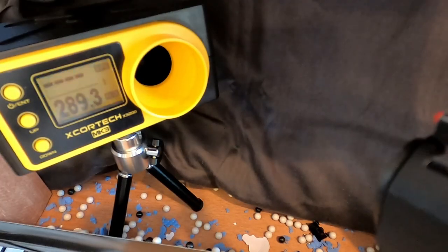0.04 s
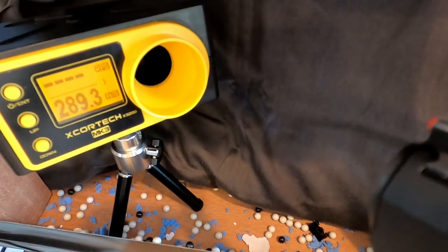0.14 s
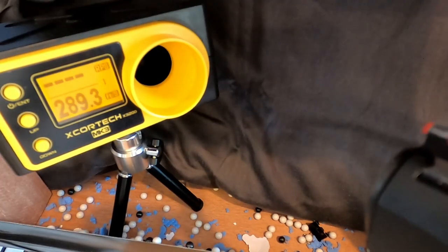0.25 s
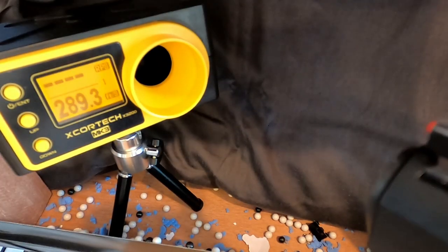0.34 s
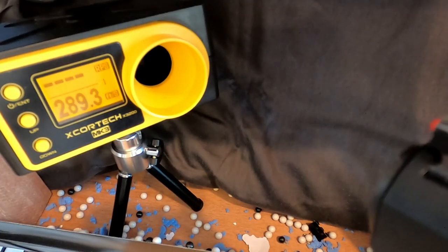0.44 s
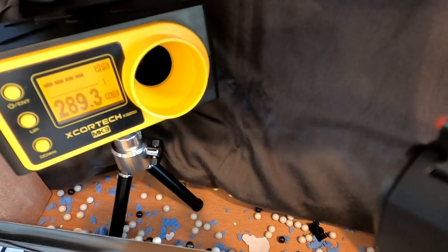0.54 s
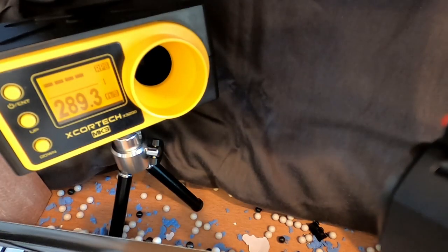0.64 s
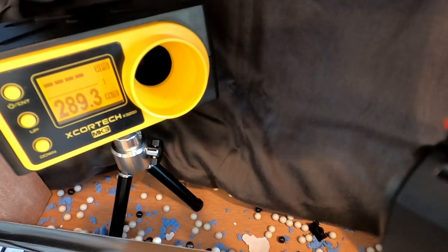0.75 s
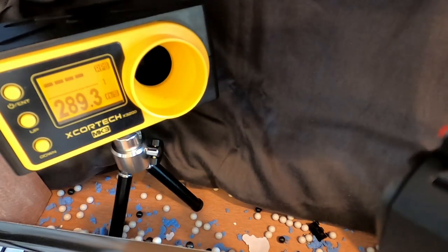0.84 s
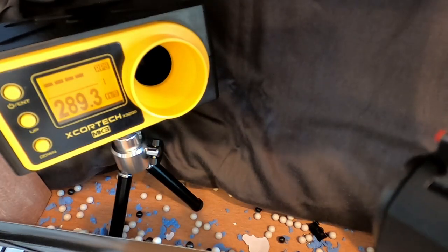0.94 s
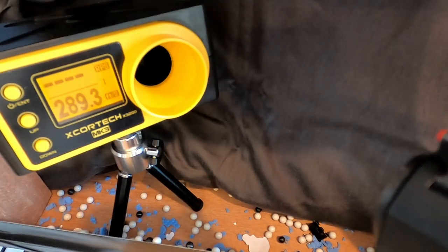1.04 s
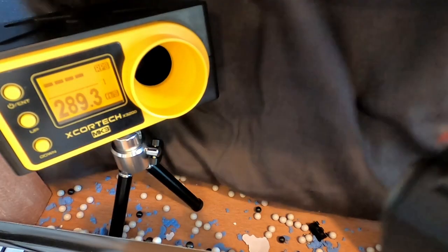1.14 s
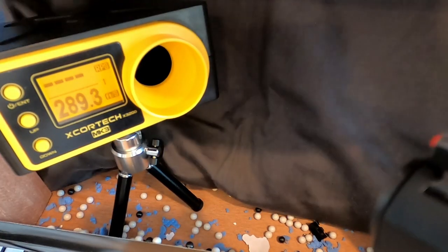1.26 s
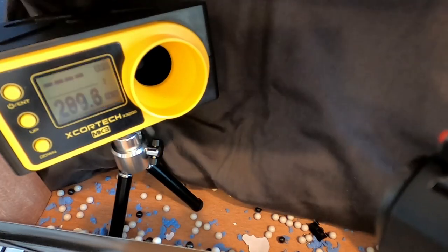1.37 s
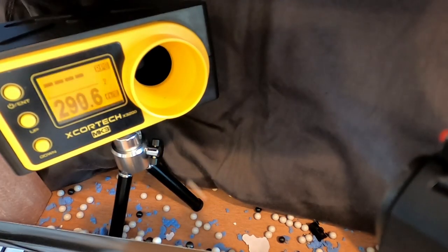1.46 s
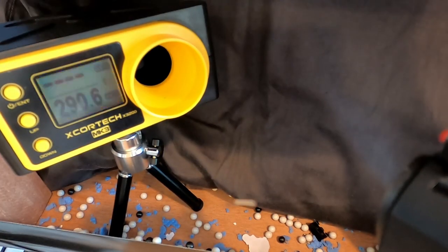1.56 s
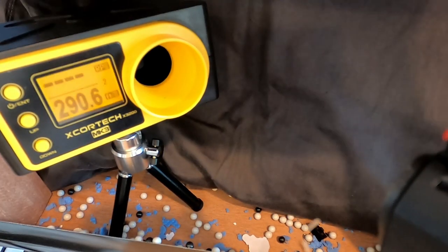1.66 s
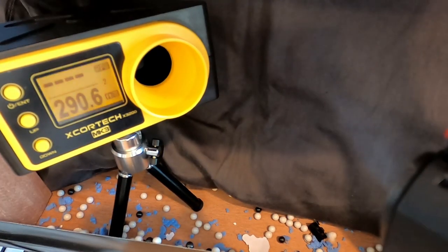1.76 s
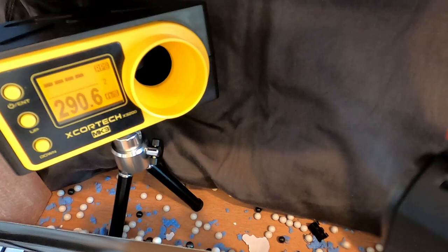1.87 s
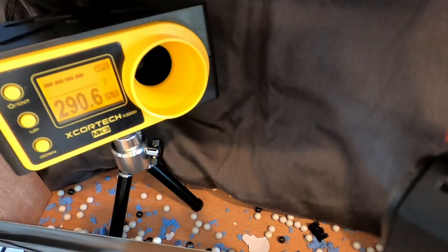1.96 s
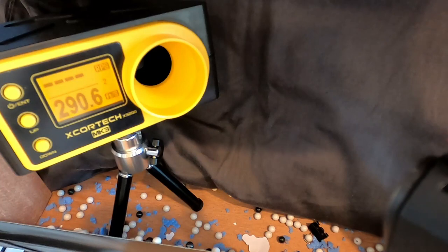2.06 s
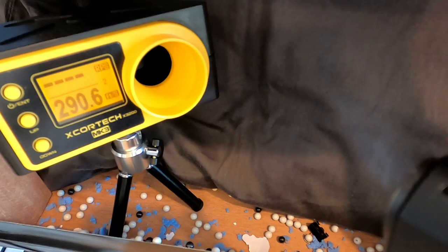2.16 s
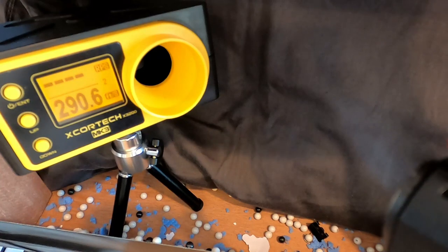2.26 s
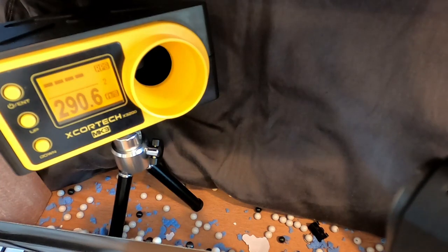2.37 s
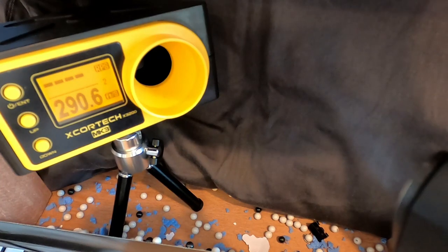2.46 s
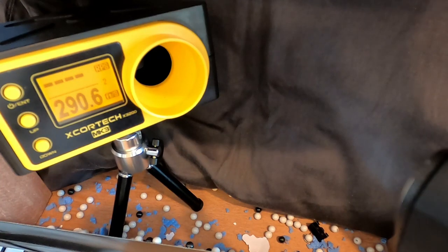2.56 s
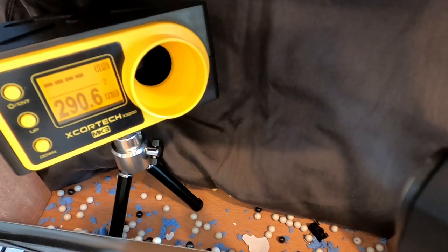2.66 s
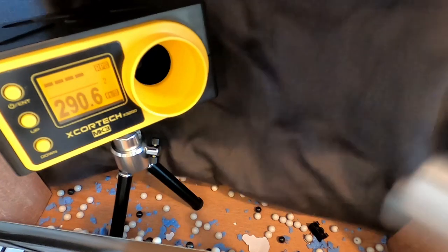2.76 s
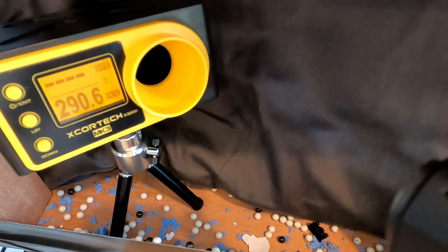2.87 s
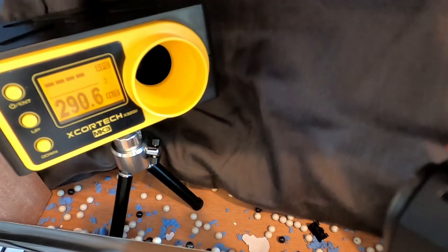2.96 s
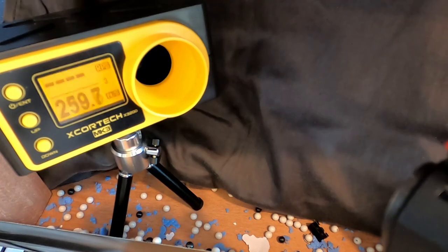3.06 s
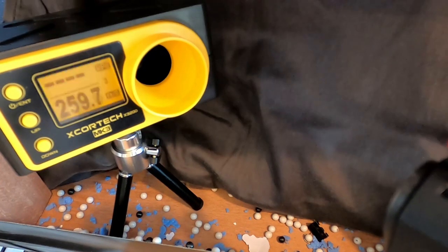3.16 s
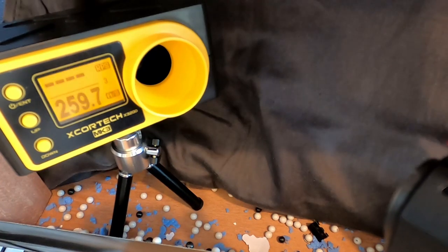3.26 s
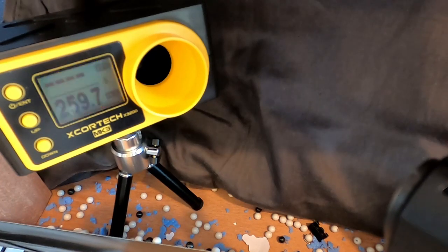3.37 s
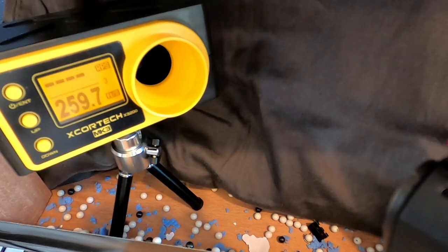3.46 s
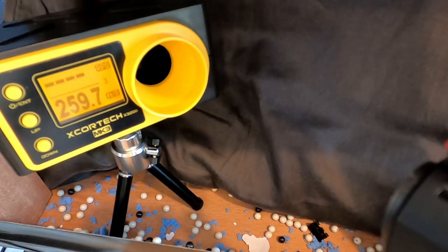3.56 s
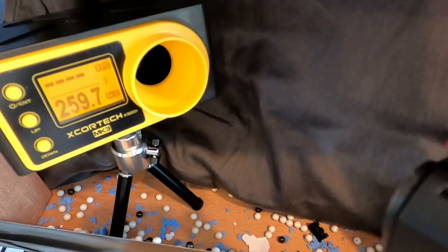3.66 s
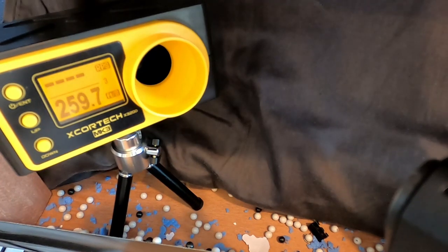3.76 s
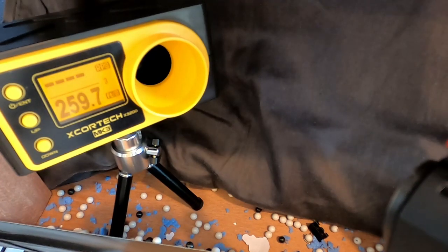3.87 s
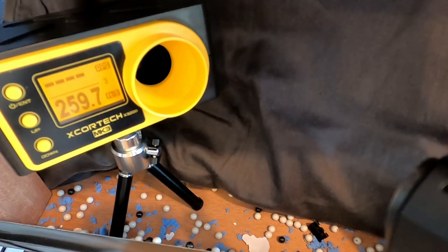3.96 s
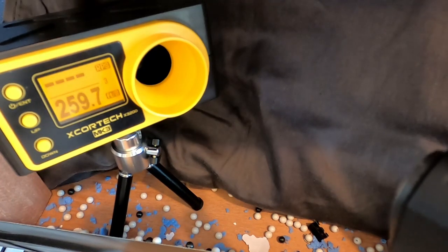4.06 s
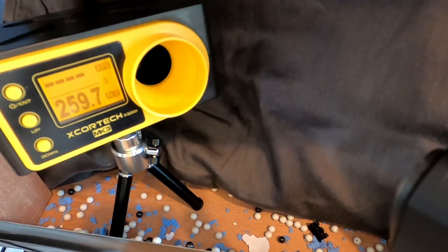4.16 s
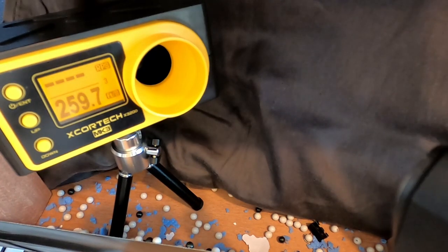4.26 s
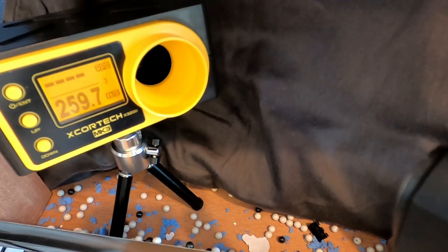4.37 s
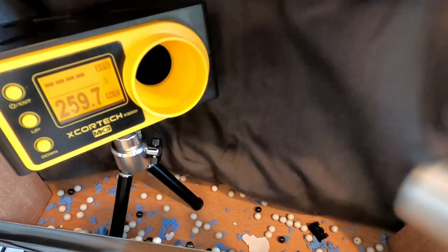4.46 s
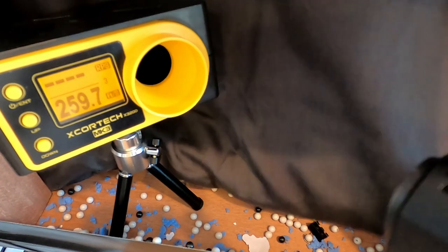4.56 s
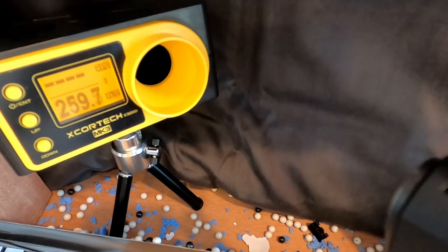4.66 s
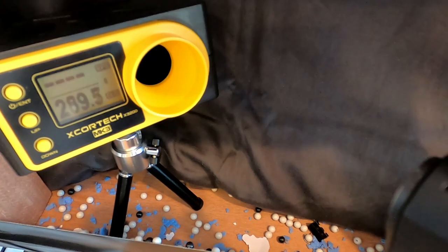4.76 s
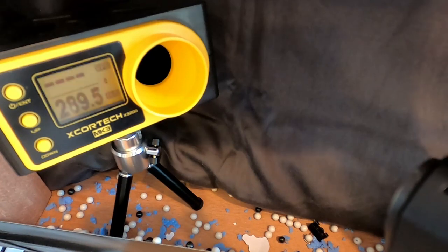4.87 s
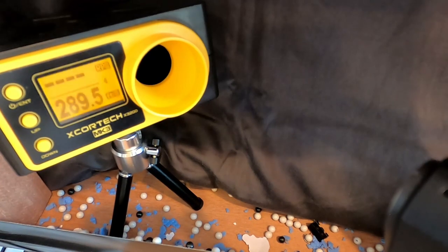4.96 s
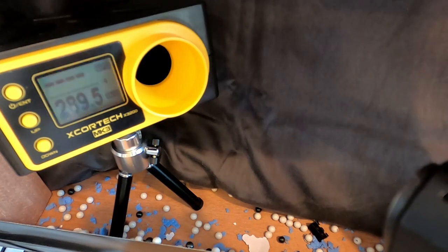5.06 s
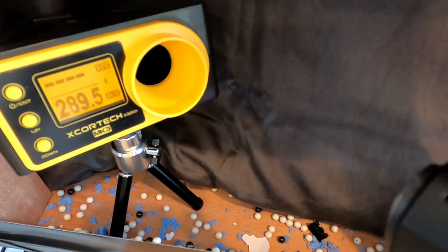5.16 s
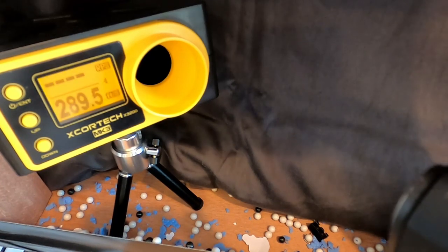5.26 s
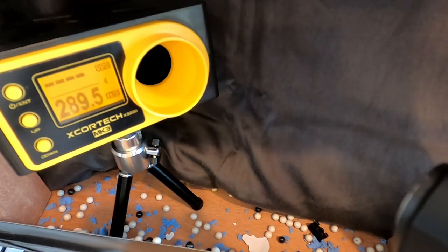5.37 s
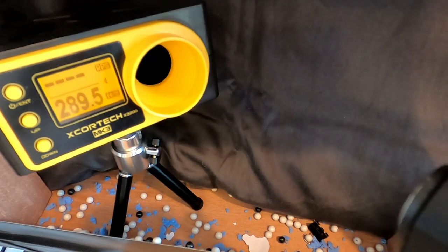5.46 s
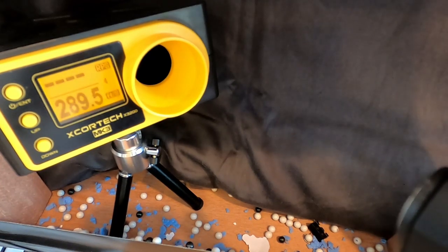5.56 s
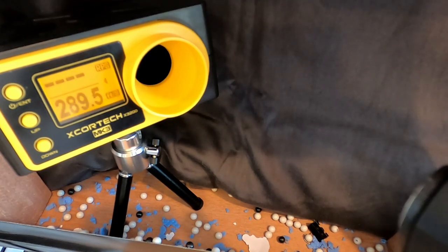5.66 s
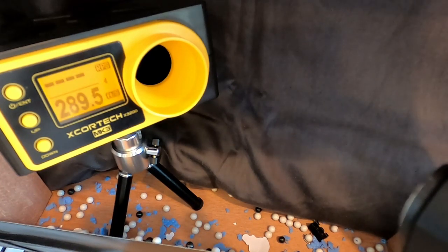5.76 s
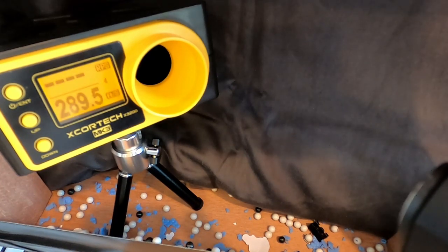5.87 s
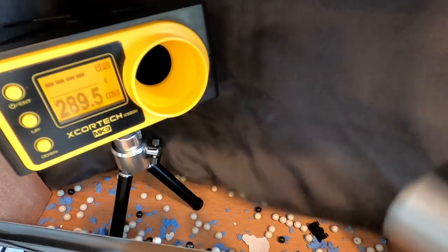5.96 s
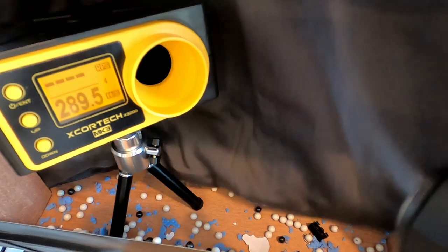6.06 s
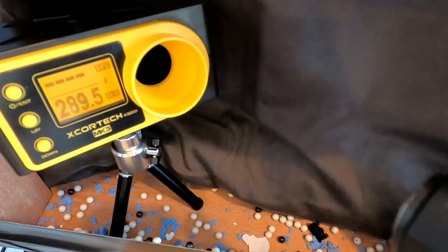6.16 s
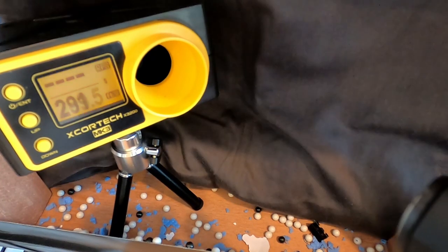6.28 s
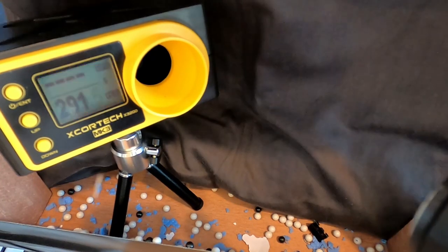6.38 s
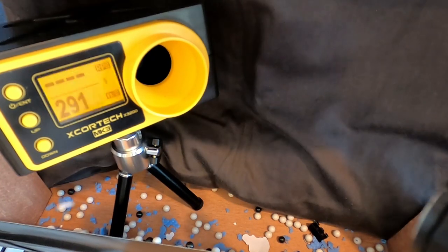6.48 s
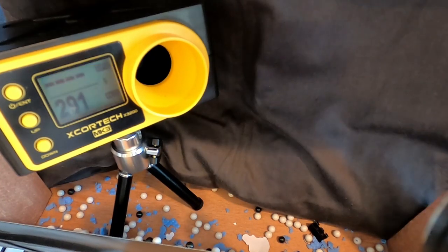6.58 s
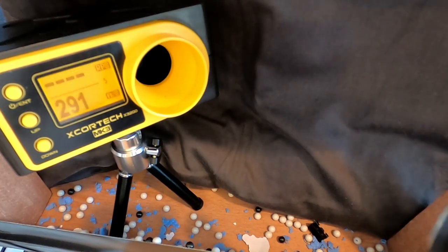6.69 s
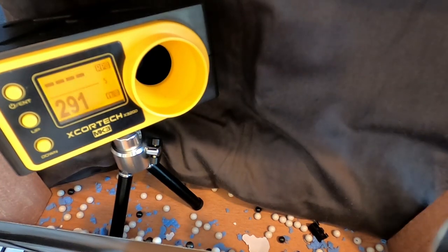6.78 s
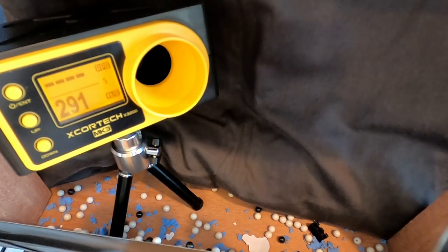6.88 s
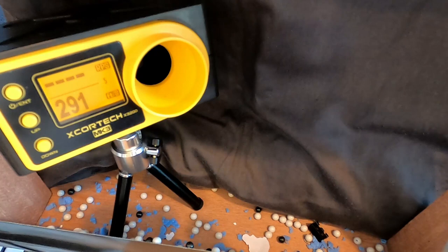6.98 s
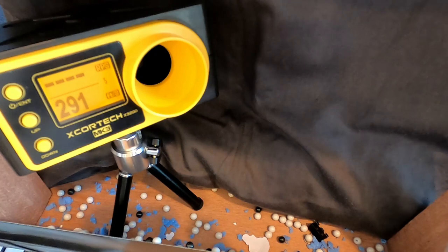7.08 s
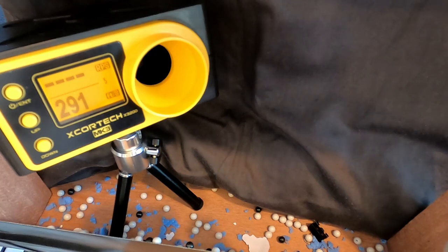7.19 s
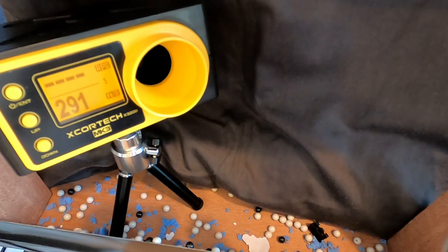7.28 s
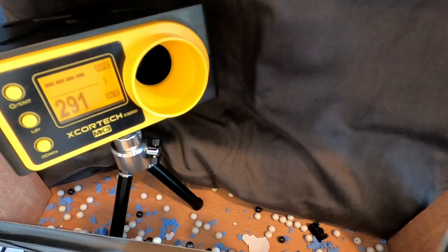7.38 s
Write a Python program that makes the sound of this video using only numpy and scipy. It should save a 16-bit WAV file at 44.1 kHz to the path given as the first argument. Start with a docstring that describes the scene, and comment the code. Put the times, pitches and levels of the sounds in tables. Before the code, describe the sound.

At the start, the tail of an earlier shot dies away into a quiet room with barely audible low rumble. At about 1.2 seconds a gas airsoft pistol fires very close: a split-second rising hiss, a sharp bright crack, a short boxy thump, and within some 55 milliseconds the metallic clack of the slide slamming shut. The room rings for well under a second. Light plastic pellets tick on hard floor from 1.55 to 2.0, with a tiny metallic click near 1.8. Similar shots come at 2.85, 4.55 and 6.05 seconds, a slight ringing tinge on the third. Single pellet ticks fall around 3.05, 5.5 and just before the last shot. After it, bounces patter irregularly from 6.35 to 7.4, the clearest near 6.55. Close, dry phone pickup, loud peaks slightly squashed, the quiet gaps sinking almost to silence.

```python
"""A gas blow-back pistol fires plastic pellets at a cloth in a box, close to a phone in a quiet room.
Each shot: banded noise swelling into noise-burst cracks, box modes thumping, slide modes rattled by every
blow, loudest when the slide slams shut. Pellets bounce on hard floor, and once a small metallic click sounds,
probably the trigger resetting: short coloured-noise ticks with a ringing tone and a modal knock.
The room rings behind all of it as bands of dying noise, over a low flickering rumble."""
import sys
import numpy as np
from scipy import signal
from scipy.fft import rfft, irfft
from scipy.io import wavfile
from scipy.ndimage import uniform_filter1d

SR = 44100
rng = np.random.default_rng(int(sys.argv[2]) if len(sys.argv) > 2 else 0)


def materialize(psi):
    """Save the field psi as 16-bit PCM at rate SR to the path in sys.argv[1].

    A 1-D psi becomes a single channel; in a 2-D psi each row is a channel.
    """
    bounded = np.clip(np.atleast_2d(psi).T, -1, 1)
    quanta = np.round(bounded * 32767).astype(np.int16)
    wavfile.write(sys.argv[1], SR, quanta)


N = 327663

# shots: start_s, crack_db, thump_db, swell_db, room_db, tripod_ring_db, rumble_sunk_db
SHOTS = [(1.1943, -8, -12, -14.5, 0.5, -65, -64.5), (2.838, -7.5, -11.5, -13, 1.77, -62, -62),
         (4.5475, -7.5, -12, -15, 1, -50, -62), (6.059, -7.5, -10.5, -13, 0, -69.5, -64)]
# blows in a shot, relative to its levels: crack_db, crack_t60_s, thump_db, slide_ring_db
# rows: gas leaves muzzle, blast returns from box, pellet hits cloth, slide hits rear stop, slide slams shut
BLOWS = [(4, 0.024, -11, -14.5), (-2, 0.036, 3, -25), (-3.5, .02, 0, -28.5), (-6.5, 0.034, -6, -13.5),
         (-2, 0.016, -5, -1.5)]
# delay of each blow after the first: delay_s
BLOW_DELAYS_S = [0, .0042, .0115, .022, .0553]
# crack spectrum: freq_hz, density_db
CRACK_SPECTRUM = [(240, -31.5), (400, -2.5), (979, -3.5), (1290, -7.5), (1680, -3.5), (3160, -6.5),
                  (3470, -4), (5110, -8.5), (5520, -11.5), (8500, -14), (16000, -40.5)]
# box modes: freq_hz, level_db, t60_s
BOX_MODES = [(47, -12.5, 0.033), (96, -4, 0.073), (175.95, -4.5, 0.079), (243.3, -2.5, 0.074),
             (357, -3.5, 0.033), (509.4, -7, 0.1), (624, -6, .04), (1020, -11, 0.039)]
# metal slide modes: freq_hz, level_db, t60_s
SLIDE_MODES = [(1940, -18, 0.025), (3000, -15.5, 0.019), (3800, -11.5, 0.058), (4680, -13, 0.036),
               (5050, -15, 0.061), (6420, -19, 0.028), (6845, -18, 0.029), (8400, -10, 0.046),
               (8920, -23, 0.078), (8170, -25, .09)]
# tripod modes: freq_hz, level_db, t60_s
TRIPOD_MODES = [(2345, -2, 1.15), (2410, 0, 1.2), (2500, -2, 1.1), (2540, -2, 1.1), (2680, -5, .9)]
# swelling hiss spectrum: freq_hz, density_db
SWELL_SPECTRUM = [(80, -20), (200, 0.5), (1160, -1), (1680, -5.5), (1940, -4.5), (2330, -11.5), (3830, -3),
                  (4200, -16), (4770, -1), (5730, -19.5), (6400, -9), (8420, -11), (10700, -21),
                  (16000, -45)]
# pellet bounces, and at 1.8229 s a small metallic click, probably the trigger resetting:
# start_s, level_db, ring_hz, ring_db, knock_db, treble_db, room_db
TICKS = [(1.5529, -40, 3770, 0, -8, -5, 4), (1.6162, -24.5, 2990, -18, -10, -18, 13),
         (1.769, -28, 2670, -23, -15, -11, 14), (1.8229, -39.5, 8500, -4, -10, -15.5, 3),
         (1.8332, -39.5, 2710, -12, -4.5, -24, 23), (1.8737, -45.5, 3000, -18, -5.5, -22, 13.5),
         (1.9875, -43.5, 2870, -22, -11.5, -22, 6), (2.0012, -45.5, 2860, -24, -24, -17, 18),
         (2.014, -48, 2810, -20, -13, -19, 13.5), (3.0658, -23, 2600, -24, -11, -23, 7),
         (5.5259, -21.5, 3200, -36, -14, -11, 17), (6.0074, -25.5, 3800, -22, -13.5, -10.5, 25),
         (6.3502, -32, 2500, -21, -23, -9, 10), (6.4438, -43, 3640, -12.5, -5.5, -21, 6),
         (6.536, -22.5, 4400, -14, -33, -19.5, 15), (6.6241, -33.5, 2950, -25, -15.5, -13, 19),
         (6.8393, -36.5, 2960, -9.5, -19, -11.5, 24), (7.006, -36, 4600, -15, -23.5, -12.5, 22.5),
         (7.1505, -34.5, 2340, -21.5, -27.5, -10.5, 20.5), (7.2748, -34, 3100, -9.5, -47, -16, 22),
         (7.3756, -37, 3350, -12, -39, -8, 22)]
# tick spectrum: freq_hz, density_db
TICK_SPECTRUM = [(300, -26), (700, -5.5), (1500, -5.5), (3000, -4.5), (5000, -6), (8500, 3), (13000, -11),
                 (16000, -27.5)]
# floor modes, the knock under the ticks: freq_hz, level_db, t60_s
FLOOR_MODES = [(510, -6.5, 0.048), (725, -4.5, 0.054), (1098, -11.5, 0.012), (1680, 0, 0.013)]
# room tail bands: centre_hz, level_db, t60_s
ROOM_BANDS = [(98, -12.5, 0.44), (254.2, -2.5, .6), (520, -8, 0.28), (910, -2, 0.84), (2160, -4, 0.82),
              (4130, -3.5, 0.84), (7600, -1, 0.74), (12700, 2.5, 0.3)]
# shot before the start, only its tail is left: start_s, crack_db, rumble_sunk_db
EARLIER_SHOT = (-0.36, -9, -63.5)
# rumble spectrum: freq_hz, density_db
RUMBLE_SPECTRUM = [(12, -43.5), (20, 1), (48, 0.5), (86, -9.5), (116, -9.5), (150, -2.5), (187, -13.5),
                   (293, -19), (422, -31.5), (513, -35.5), (738, -41.5), (825, -40.5), (1480, -45),
                   (2600, -59.5), (16000, -77.5)]

CRACK_RISE_T60_S, THUMP_LAG_S, THUMP_PUSH_S = 0.0054, 0.0014, 0.0015
SWELL_S, SWELL_POWER = 0.047, 1.8
SWELL_BANDS_DB = 6  # random unevenness across the hiss
NEAR_DB, NEAR_T60_S = -12.5, 0.11  # echoes of a tick from near surfaces
LEAD_DB, LEAD_S = -27, 0.034  # hiss ahead of a tick
ROOM_DB, ROOM_GAP_S, ROOM_BEND_DB_PER_S2 = -10.5, 0.0056, -24
QUIET_DB, QUIET_DB_PER_DB, QUIET_S = -51.5, 0.34, 0.047  # threshold, slope, averaging window
CREEP_DB_PER_S = 8
BOOM_DB, BOOM_T60_S = -40, 0.89
SIDE_HZ, SIDE_DB = 10500, -4.5
TOP_HZ = 15900
CEILING = 0.97  # limit of the peak rounding


def undb(db):
    """Decibels to amplitude ratio."""
    return 10 ** (np.asarray(db) / 20)


def unit(x):
    """Scale to unit RMS."""
    return x / np.sqrt(np.mean(x ** 2))


def energy_root(x):
    """Root of the summed squares."""
    return np.sqrt(np.sum(x ** 2))


def colour(x, table, size=4096):
    """Unit-energy minimum-phase filter through (freq_hz, density_db) points."""
    hz, db = np.transpose(table)
    grid_hz = np.maximum(np.arange(size // 2 + 1) * SR / size, 1)
    log_gain = np.interp(np.log(grid_hz), np.log(hz), db) * np.log(10) / 20
    # folding the cepstrum makes the filter causal
    cepstrum = irfft(log_gain)
    cepstrum[1:size // 2] *= 2
    cepstrum[size // 2 + 1:] = 0
    response = irfft(np.exp(rfft(cepstrum)))[:size // 2]
    return signal.fftconvolve(x, response / energy_root(response))[:len(x)]


def fade(t60_s, size):
    """Exponential decay, 60 dB in t60_s."""
    return np.exp(-np.log(1000) * np.arange(size) / SR / t60_s)


def ring(modes, scatter_db, size, detune):
    """Decaying sines of struck modes; each blow scatters their levels and pitches."""
    t = np.arange(size) / SR
    out = np.zeros(size)
    for hz, db, t60_s in modes:
        level_chance, pitch_chance = rng.standard_normal(2)
        tone = np.sin(2 * np.pi * hz * (1 + detune * pitch_chance) * t)
        out += undb(db + scatter_db * level_chance) * tone * fade(t60_s, size)
    return out


def add(out, start_s, x):
    """Mix x into out at start_s."""
    i = int(start_s * SR)
    out[i:i + len(x)] += x[:len(out) - i]


def walk(rate_hz):
    """Random levels held 1 / rate_hz, smoothed by two running means."""
    hold = int(SR / rate_hz)
    steps = np.repeat(rng.standard_normal(N // hold + 1), hold)
    return uniform_filter1d(uniform_filter1d(steps, hold), hold)[:N]


def pistol():
    """All shots: blows, tripod ring and swelling hiss; dry and room shares."""
    dry, wet = np.zeros(N), np.zeros(N)
    for start_s, crack_db, thump_db, swell_db, room_db, tripod_db, _ in SHOTS:
        for delay_s, (c_db, t60_s, t_db, slide_db) in zip(BLOW_DELAYS_S, BLOWS):
            near, far = blow(crack_db + c_db, t60_s, thump_db + t_db, crack_db + slide_db)
            add(dry, start_s + delay_s, near)
            add(wet, start_s + delay_s, far * undb(room_db))
        add(dry, start_s, undb(tripod_db) * ring(TRIPOD_MODES, 1.5, 65536, 0.003))
        add(dry, start_s - SWELL_S, undb(swell_db) * swell())
    return dry, wet


def blow(crack_db, t60_s, thump_db, slide_db, size=32768):
    """One blow sums noise crack, box thump and slide ring; dry and room shares."""
    crack, pop = noise_crack(t60_s, size)
    thump = undb(thump_db) * box_thump(size)
    metal = slide_ring(size)
    near = undb(crack_db) * crack + undb(slide_db) * metal
    far = undb(crack_db) * pop + undb(slide_db - 10) * metal
    # minus: the thump sucks first
    return near - thump, far - thump


def noise_crack(t60_s, size):
    """Coloured noise burst with a fast rise, and a smooth pop of equal energy for the room."""
    shape = fade(t60_s, size) * (1 - fade(CRACK_RISE_T60_S, size))
    crack = colour(rng.standard_normal(size) * shape, CRACK_SPECTRUM)
    impulse = np.zeros(size)
    impulse[0] = energy_root(shape)
    return crack, colour(impulse, CRACK_SPECTRUM)


def box_thump(size):
    """Box modes driven by a short, soft, delayed push."""
    lag = np.zeros(int(THUMP_LAG_S * SR))
    push = np.r_[lag, np.hanning(int(THUMP_PUSH_S * SR) + 3)]
    return signal.fftconvolve(ring(BOX_MODES, 3.7, size, 0.056), push / push.sum())[:size]


def slide_ring(size):
    """Metal slide modes rung by a rattling contact, a decaying noise burst."""
    rattle = rng.standard_normal(size) * fade(0.0096, size)
    modes = ring(SLIDE_MODES, 3.5, size, 0.0011)
    return signal.fftconvolve(modes, rattle / energy_root(rattle))[:size]


def swell():
    """Randomly banded hiss rising up to a crack."""
    n = int(SWELL_S * SR)
    rise = np.sin(np.pi / 2 * np.arange(n) / n) ** (2 * SWELL_POWER)
    bands = np.c_[np.arange(900, 16000, 330), SWELL_BANDS_DB * rng.standard_normal(46)]
    hiss = colour(colour(rng.standard_normal(3 * n), SWELL_SPECTRUM), bands)
    return rise * unit(hiss[2 * n:])


def hard_ticks(size=4096):
    """Pellet bounces and the metallic click: noise smeared by near surfaces, tone, knock; dry and room shares."""
    dry, wet, t = np.zeros(N), np.zeros(N), np.arange(size) / SR
    direct = fade(0.0068, size) * (1 - fade(0.003, size))
    echoes = undb(NEAR_DB) * fade(NEAR_T60_S, size) * (1 - fade(0.017, size))
    smear = direct + echoes
    impulse = 1.0 * (t == 0)
    for start_s, db, hz, ring_db, knock_db, treble_db, room_db in TICKS:
        # each tick favours the band around its ring and has its own share of treble
        own_colour = sorted([(hz / 2.9, 0), (hz, 4.0), (min(hz * 1.6, 6000), 0), (9000, treble_db)])
        tick = colour(colour(rng.standard_normal(size) * smear, TICK_SPECTRUM), own_colour)
        pop = colour(colour(impulse, TICK_SPECTRUM), own_colour)
        tone = undb(ring_db) * np.sin(2 * np.pi * hz * t) * fade(0.048, size)
        knock = undb(knock_db) * ring(FLOOR_MODES, 3.3, size, 0.074)
        add(dry, start_s, (tick + tone + knock) * undb(db))
        add(wet, start_s, pop * undb(db + room_db))
        # faint hiss leads into each tick
        n = int(LEAD_S * SR)
        hiss = colour(colour(rng.standard_normal(size), TICK_SPECTRUM), own_colour)
        lead = hiss[-n:] * (np.arange(n) / n) ** 3.2
        add(dry, start_s - LEAD_S, lead * undb(db + LEAD_DB))
    return dry, wet


def room(size=50000):
    """Room impulse response: bands of noise, each dying at its own rate."""
    t, out = np.arange(size) / SR, np.zeros(size)
    for hz, db, t60_s in ROOM_BANDS:
        edges_hz = [hz / 1.59, min(hz * 1.45, 0.45 * SR)]
        band = signal.butter(2, edges_hz, "band", fs=SR, output="sos")
        out += undb(db) * signal.sosfilt(band, rng.standard_normal(size)) * fade(t60_s, size)
    # soft onset; the tail falls ever faster
    out = out * (1 - np.exp(-t / ROOM_GAP_S)) * undb(ROOM_BEND_DB_PER_S2 * t ** 2)
    return undb(ROOM_DB) * out / energy_root(out)


def suppress(x):
    """Phone noise suppressor: attenuation grows with depth under a power threshold."""
    power = np.maximum(uniform_filter1d(x ** 2, int(QUIET_S * SR)), 1e-12)
    under_db = np.minimum(10 * np.log10(power) - QUIET_DB, 0)
    return x * undb(QUIET_DB_PER_DB * under_db)


def rumble():
    """Low noise that booms at each shot, sinks and creeps back; each band flickers alone."""
    t = np.arange(N) / SR
    earlier_s, _, earlier_sunk_db = EARLIER_SHOT
    level = undb(earlier_sunk_db + CREEP_DB_PER_S * (t - earlier_s))
    for start_s, *_, sunk_db in SHOTS:
        since_s = np.maximum(t - start_s, 0)
        boom = undb(BOOM_DB - 60 * since_s / BOOM_T60_S)
        creep = undb(sunk_db + CREEP_DB_PER_S * since_s)
        level = np.where(t < start_s, level, np.hypot(creep, boom))
    noise = unit(colour(rng.standard_normal(N), RUMBLE_SPECTRUM))
    below = []
    for edge_hz in (45, 90, 200, 400):
        low = signal.butter(3, edge_hz, fs=SR, output="sos")
        below.append(signal.sosfiltfilt(low, noise))
    # differences of successive low-passes are bands
    bands = np.diff([0 * noise, *below, noise], axis=0)
    return sum(band * undb(1.6 * walk(19)) for band in bands) * level


def scene():
    """Shots and ticks with room tail, suppressed, widened in the top treble, over the rumble."""
    shots, shots_wet = pistol()
    ticks, ticks_wet = hard_ticks()
    tail = room()
    wet = signal.fftconvolve(shots_wet + ticks_wet, tail)[:N]
    earlier_s, earlier_db, _ = EARLIER_SHOT
    earlier_far = blow(earlier_db, 0.023, -25, -8)[1]
    earlier_tail = signal.fftconvolve(earlier_far, tail)
    add(wet, 0, earlier_tail[int(-earlier_s * SR):])
    mid = suppress(shots + ticks + wet)
    # the two channels differ only in the top treble
    high = signal.butter(8, SIDE_HZ, "high", fs=SR, output="sos")
    scramble = unit(uniform_filter1d(rng.standard_normal(N), size=30))
    side = undb(SIDE_DB) * scramble * signal.sosfilt(high, mid)
    return mid + rumble() + np.array([side, -side])


def record(dry):
    """The phone drops the deepest bass, rounds the loudest peaks and cuts the top."""
    bass_cut = signal.butter(2, 30, "high", fs=SR, output="sos")
    top_cut = signal.ellip(10, 0.2, 80, TOP_HZ, fs=SR, output="sos")
    rounded = CEILING * np.tanh(1.095 * signal.sosfilt(bass_cut, dry) / CEILING)
    return signal.sosfilt(top_cut, rounded)


dry = scene()
out = record(dry)
materialize(out)
```